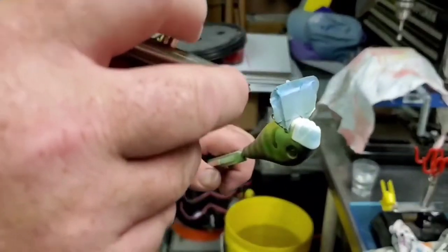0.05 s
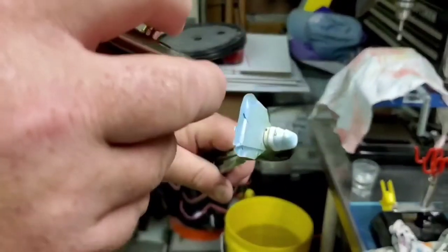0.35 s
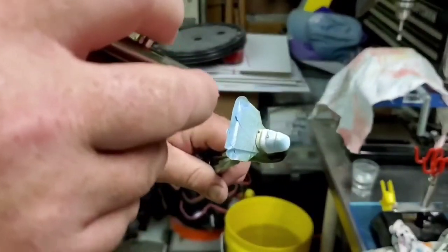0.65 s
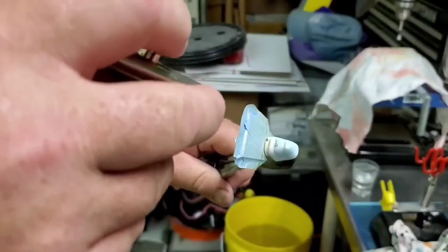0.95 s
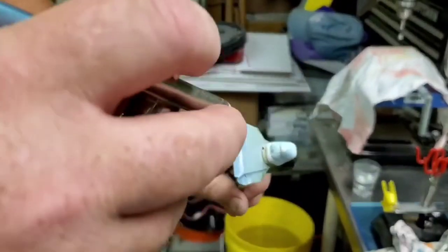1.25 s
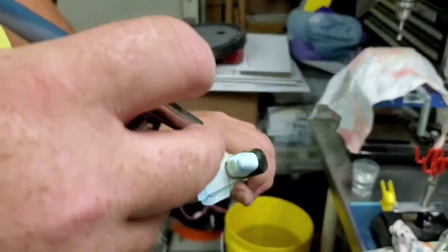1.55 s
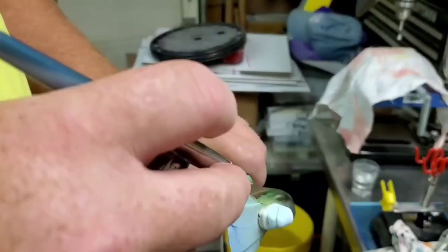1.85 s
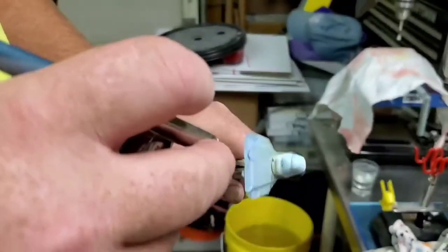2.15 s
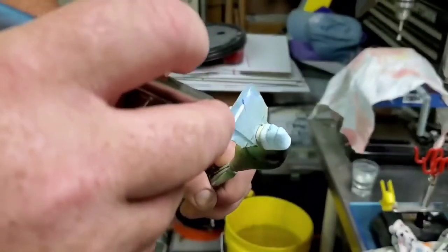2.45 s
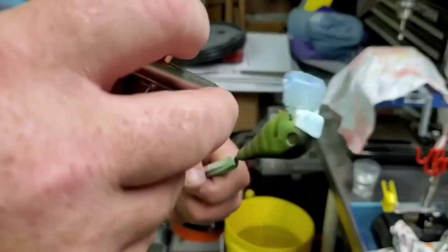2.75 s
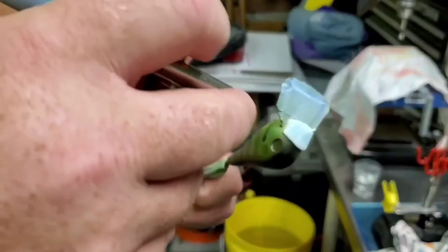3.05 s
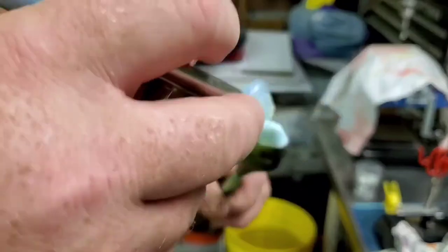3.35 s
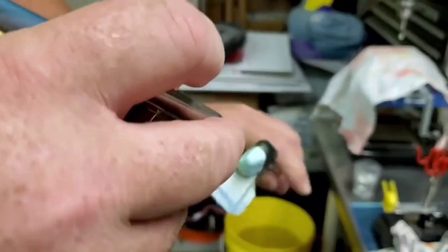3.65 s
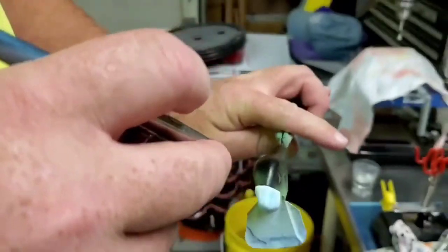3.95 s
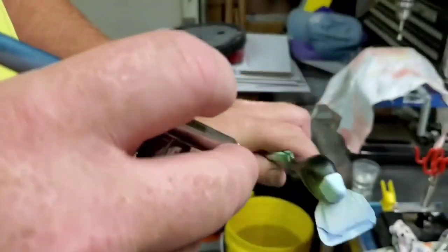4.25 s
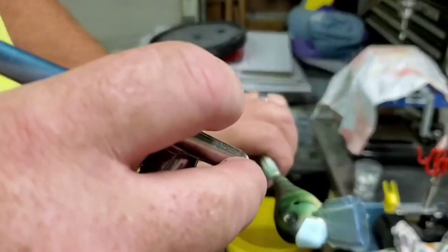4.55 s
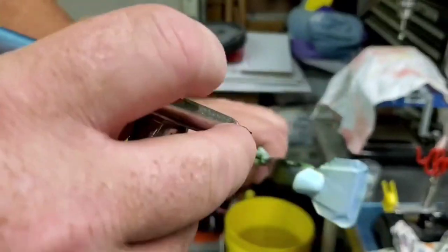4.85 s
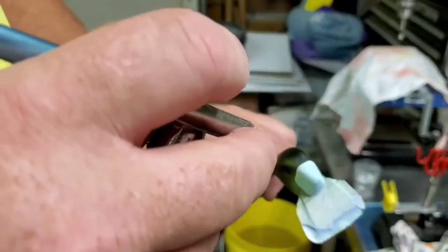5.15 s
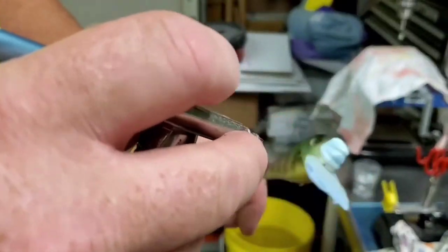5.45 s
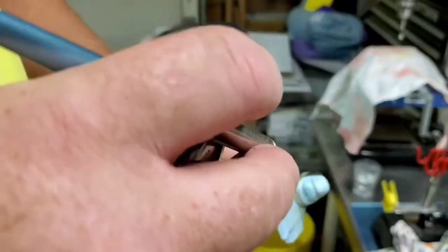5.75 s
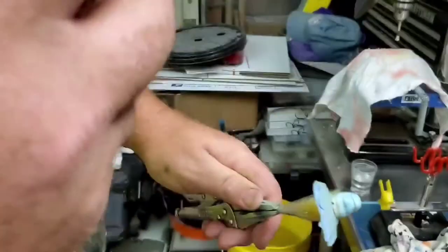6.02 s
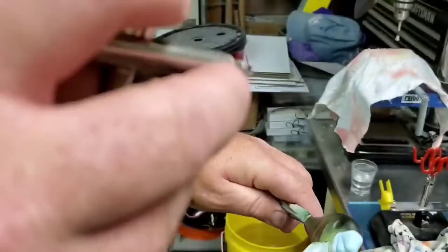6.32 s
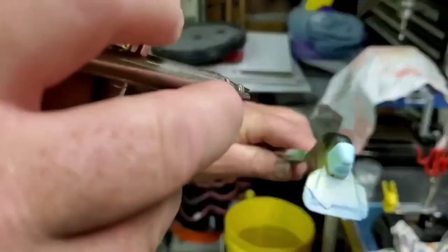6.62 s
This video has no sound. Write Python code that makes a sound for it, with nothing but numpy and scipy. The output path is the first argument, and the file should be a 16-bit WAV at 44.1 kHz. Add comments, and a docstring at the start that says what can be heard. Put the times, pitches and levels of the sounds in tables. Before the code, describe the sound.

Close bursts of airbrush hiss start and stop unevenly, ending in quick puffs, while a workshop fan hums faintly.

```python
"""An airbrush sprays a small hand-held lure in a workshop, over a fan's steady whine and rumble.
At each press of the trigger a valve opens and stored air spits out; the turbulent jet then fizzes,
hisses and roars against the lure, whistling where an edge crosses it. After most bursts the trigger
ticks as it springs back, and now and then there is a soft low bump. At 4.5 s the valve squeaks;
the longest stroke follows, then four quick puffs, and from about 6.5 s the fan is left alone."""
import sys
import numpy as np
from scipy import signal
from scipy.fft import rfft, irfft, next_fast_len
from scipy.io import wavfile
from scipy.ndimage import uniform_filter1d, map_coordinates

SR = 44100
rng = np.random.default_rng(int(sys.argv[2]) if len(sys.argv) > 2 else 0)


def put_to_file(sound):
    """Save the sound as 16-bit audio at rate SR, in the file named by the first command-line argument."""
    columns = np.atleast_2d(sound).T  # one column per channel
    safe = np.clip(columns, -1, 1)
    whole_steps = np.round(safe * 32767)
    wavfile.write(sys.argv[1], SR, whole_steps.astype(np.int16))


N = 303408
TIME = np.arange(N) / SR

# Noise spectra of the jet's three parts: frequency_hz, relative_density_db
FIZZ_SPECTRUM = [(6500, -34), (8000, -2.5), (9500, -2), (11500, 0), (13500, 2), (14500, 0), (16000, -5.5)]
HISS_SPECTRUM = [(1300, -13.5), (2200, -4), (2900, 0), (3500, -0.5), (4500, -1.5), (5500, -2), (6200, -4.5),
                 (7400, -3), (8300, -13), (10000, -42)]
ROAR_SPECTRUM = [(82, -39.5), (140, -12.5), (183, -17), (267, -5), (325, -9.5), (446, -1), (598, -4),
                 (657, -0.5), (713, -4), (783, -0.5), (978, -4), (1330, -2), (1860, -4.5), (2300, -12),
                 (2990, -31.5), (5060, -120)]


def jet(spurt_s=6.226, spurt_db=9.5, roar_db_per_impact_db=1.36, crossover_hz=600):
    """Turbulence radiates broadband noise: fizz at the nozzle, hiss in the spray, a roar on the lure."""
    fizz_gain, hiss_gain, roar_gain, low_gain = strokes()
    impact_db = incidence() + .5 * wobble(16)  # the hand is never quite still
    fizz_db = spurt_db * swell(spurt_s, 0.0097) + 0.51 * wobble(20)  # the nozzle clears in one spurt
    fizz = fizz_gain * amp(fizz_db) * swirled(noise(FIZZ_SPECTRUM), depth_db=2.5)
    hiss = hiss_gain * amp(impact_db) * swirled(noise(HISS_SPECTRUM), depth_db=0.98)
    roar_db = roar_db_per_impact_db * impact_db + 0.81 * wobble(60)
    roar = amp(roar_db) * swirled(noise(ROAR_SPECTRUM), depth_db=1.0)
    low = filtered(roar, lambda hz: 1 / (1 + (hz / crossover_hz) ** 4))
    flutter = amp(0.65 * wobble(170))  # the paint breaks up unevenly
    return flutter * (fizz + hiss + edge_tone(hiss_gain) + roar_gain * (roar - low) + low_gain * low)


# Trigger presses; the lure faces the jet at facing_fraction of the stroke:
# open_s, shut_s, spit_db, spit_t60_s, fizz_db, hiss_db, roar_db, low_roar_boost_db, facing_fraction
PRESSES = [(0.078, 0.365, -39.5, 0.05, -40, -39.3, -39.5, 2.5, 0.43),
           (0.516, 1.21, -36.5, 0.079, -39.5, -39.5, -40.5, -2.5, 0.5),
           (1.692, 1.893, -58, .04, -38.5, -39, -39.5, 0, 0.61),
           (2.103, 2.418, -32.5, 0.086, -39, -38, -39.5, -1.5, 0.59),
           (2.536, 2.923, -31, 0.039, -38.5, -37.5, -37.5, -4.5, 0.49),
           (3.094, 3.531, -38.5, 0.045, -40, -40.5, -39, 1.5, 0.24),
           (3.73, 3.837, -37.5, 0.13, -38.5, -41.5, -44.5, 0, 0.46),
           (4.1, 4.462, -29, 0.4, -40.5, -40.5, -39.5, 3, .45),
           (4.747, 5.698, -24.5, 0.065, -38.5, -38.5, -38, 0, 0.48),
           (5.934, 6.071, -52, 0.065, -41.5, -40.7, -43, 3, 0.63),
           (6.195, 6.235, -54, .06, -40.5, -36.5, -49, -5, 0.66),
           (6.315, 6.329, -62, .06, -42, -43.5, -61, -1, .5),
           (6.363, 6.382, -73, .06, -42.5, -43.5, -57, 2, 0.4)]


def strokes(draw_s=0.54, draw_db_per_s=6.5, ease_db_per_s=4, paint_lag_s=.004):
    """Jet noise grows with flow: gains of fizz, hiss, roar and low roar as the trigger is worked."""
    gains = np.zeros((4, N))
    for start, end, _, _, fizz_db, hiss_db, roar_db, low_boost_db, facing in PRESSES:
        age = np.clip(TIME - start, 0, end - start)
        draw = amp(draw_db_per_s * np.minimum(age, draw_s) - ease_db_per_s * np.maximum(age - draw_s, 0))
        off_face = (2 * (age / (end - start) - facing)) ** 2  # 1 at half a stroke from the lure's face
        air = draw * valve(start, end)
        fizz = draw * valve(start + paint_lag_s, end + paint_lag_s) * amp(fizz_db)
        hiss = air * amp(hiss_db - 1.07 * off_face)
        roar = air * amp(roar_db - 2.5 * off_face)
        gains += [fizz, hiss, roar, roar * amp(low_boost_db)]
    return gains


def valve(start, end, open_db_per_s=1250, shut_db_per_s=861):
    """Throttling: the flow (0-1) builds exponentially and bleeds away a little more slowly."""
    closed_db = np.maximum((start - TIME) * open_db_per_s, (TIME - end) * shut_db_per_s)
    return amp(-np.clip(closed_db, 0, 120))


# The lure turning under the jet, one list for each of two strokes: time_s, impact_db
LURE_TURNS = [
    [(2.12, -39), (2.154, -40), (2.204, -38), (2.292, -43), (2.318, -40), (2.358, -42.5), (2.406, -40),
     (2.42, -41)],
    [(4.78, -33.5), (4.946, -36), (4.964, -40.5), (5.118, -40), (5.146, -38), (5.35, -41), (5.498, -37),
     (5.552, -40), (5.69, -37)],
]


def incidence():
    """A jet is louder the more squarely it strikes: the swing in dB about each turn's mean."""
    swing_db = np.zeros(N)
    for turn in LURE_TURNS:
        time_s, impact_db = np.transpose(turn)
        during = (TIME > time_s[0] - .05) & (TIME < time_s[-1] + .05)
        swing_db += during * np.interp(TIME, time_s, impact_db - impact_db.mean())
    return swing_db


def swirled(x, depth_db):
    """Spectral modulation: patches of gain shift as the jet meets changing faces of the lure."""
    spectra = signal.stft(x, nperseg=512)[2]
    patches = uniform_filter1d(rng.standard_normal(spectra.shape), size=5, axis=1)  # across frequency
    patches = uniform_filter1d(patches, size=22, axis=2)  # across time
    return unit(signal.istft(spectra * amp(depth_db * unit(patches)), nperseg=512)[1][:, :N])


# Edges of the lure crossing the jet: time_s, level_db
CROSSINGS = [(0.202, -41), (2.213, -38), (3.181, -38.5), (3.28, -40.5), (3.365, -38), (3.437, -35.5),
             (3.511, -42), (5.628, -35.5)]
# Their band of noise: frequency_hz, relative_density_db
EDGE_SPECTRUM = [(5000, -20.5), (6200, -9.5), (6900, -3.5), (7600, -2), (8100, -13.5), (9000, -23)]


def edge_tone(hiss_gain):
    """A jet split by an edge whistles breathily; faint stray whistles come and go with the spray."""
    crossings = sum(amp(level_db) * swell(time_s, 0.014) for time_s, level_db in CROSSINGS)
    stray = hiss_gain * amp(-17 + 4 * wobble(14))
    return (crossings + stray) * swirled(noise(EDGE_SPECTRUM), depth_db=-1.0)


def spits(rise_s=0.0046):
    """Pressure release: air stored in the hose leaves as a dull, decaying puff at each press."""
    envelope = np.zeros(N)
    for start, _, level_db, t60_s, *_ in PRESSES:
        age = TIME - start
        attack = np.clip(1 + age / rise_s, 0, 1)
        envelope += attack * amp(level_db - 60 * np.maximum(age - rise_s, 0) / t60_s)
    return envelope * noise([(30, -30), (120, 1.5), (400, 11.5), (1400, 13.5), (3500, 6), (5500, 0),
                             (7000, -30), (12000, -35)])


# The trigger springing back: time_s, relative_level_db, brightness_hz
TRIGGER_RETURNS = [(0.4496, -54, 2770), (1.312, -48.5, 2900), (1.9734, -53, 3210), (2.9867, -39, 2600),
                   (3.8545, -34.5, 3450), (4.5424, -56, 2710), (4.597, -57, 2190), (5.763, -47.5, 5780),
                   (5.79, -32.5, 4960), (6.434, -54.5, 3350)]
# Resonances of the metal body: centre_hz, bandwidth_hz, relative_level_db
BODY_MODES = [(1180, 620, -10), (2030, 320, -8), (2740, 230, -13), (3410, 580, 0.5), (4800, 490, -3.5),
              (5620, 990, -2.5), (7200, 800, -14), (11100, 2700, -6)]


def ticks(rise_s=0.0059, t60_s=0.069):
    """Modal resonance: the trigger scrapes to its stop and rings the body; soft contact is duller."""
    out = np.zeros((2, N))
    t = np.arange(SR // 4) / SR
    hz = np.fft.rfftfreq(len(t), 1 / SR)
    envelope = np.minimum(t / rise_s, 1) ** 2 * amp(-60 * np.maximum(t - rise_s, 0) / t60_s)
    for time_s, level_db, brightness_hz in TRIGGER_RETURNS:
        grip = np.exp(rng.normal(0, 0.013))  # the fingers shift the resonances
        body = sum(amp(mode_db + rng.normal(0, 4.5)) / (1 + ((hz - grip * centre) / (width / 2)) ** 2)
                   for centre, width, mode_db in BODY_MODES)
        contact_lowpass = 1 / (1 + (hz / (1.7 * brightness_hz)) ** 6)
        friction = rfft(rng.standard_normal((2, len(t))))
        scrape = unit(irfft(friction * body * contact_lowpass, len(t)))
        onset = round((time_s - rise_s / 2) * SR)
        out[:, onset:onset + len(t)] += amp(level_db - 8) * envelope * scrape
    return out


def reflections(x, echo_db, max_delay_s=.009, count=7):
    """Comb filtering: the bench and moving hands return weak early copies, different at each ear."""
    echoes = np.zeros((2, N))
    for ear in range(2):
        for delay_s in max_delay_s * rng.uniform(0.1197, 1, count):
            delayed = np.pad(x[ear], (round(delay_s * SR), 0))[:N]
            echoes[ear] += np.tanh(wobble(1.503)) * delayed
    return (x + amp(echo_db) * echoes / np.sqrt(count / 3)) / np.sqrt(1 + amp(echo_db) ** 2)


# The valve seating: time_s, pitch_hz, level_db
VALVE_SQUEAK = (4.53, 4630, -69)


def squeak():
    """Flow-induced tone: air whistles thinly past the valve seat, once."""
    time_s, pitch_hz, level_db = VALVE_SQUEAK
    return amp(level_db) * swell(time_s, 0.022) * np.sin(2 * np.pi * pitch_hz * TIME + .5 * wobble(120))


# Soft bumps close by: time_s, level_db
BUMPS = [(0.078, -44), (2.535, -46), (3.095, -48), (3.862, -42), (4.722, -38), (6.487, -39)]


def bumps():
    """A short pulse of low-frequency noise is heard as a dull thud with no ring."""
    envelope = sum(amp(level_db) * swell(time_s, 0.015) for time_s, level_db in BUMPS)
    return envelope * noise([(20, -30), (60, 14), (110, -7), (200, -50), (600, -60)])


# Partials of the fan's whine: pitch_hz, level_db
FAN_PARTIALS = [(323.0, -67.5), (602.9, -78.5), (721.4, -58), (839.8, -82), (2815, -102), (2993, -83),
                (3408, -87), (3881, -86.5)]
# The whine's phase between the ears: time_s, apart_rad
INTERAURAL_PHASE = [(0.1, 3.6), (0.45, 1.7), (2.0, 1.4), (4.6, 1.73), (5.8, 0.45), (6.13, 4.1),
                    (6.26, 0.31), (6.7, 0.52), (6.76, 2.1)]
# Spectra of the rumble and the moving air: frequency_hz, relative_density_db
RUMBLE_SPECTRUM = [(15, -22), (30, -18), (45, -15), (54, -3), (62, -6), (72, -12), (100, -14), (130, -25.5),
                   (200, -27.5), (240, -43), (400, -71)]
DRAUGHT_SPECTRUM = [(200, -28), (270, -9.5), (345, 2), (400, -11), (600, -11), (680, -9.5), (850, -14.5),
                    (1000, -23.5), (1250, -24), (1700, -31), (2600, -32), (3000, -26), (3600, -36.5),
                    (8000, -43)]
# A dip near 9 kHz in the recorder's faint background hiss: frequency_hz, gain_db
FLOOR_HISS_DIP = [(7800, 0), (8800, -22), (10200, -13), (11500, 3)]


def fan(rumble_db=-52.06, draught_db=-59.5):
    """Tonal plus broadband noise: a whine drifts in phase between the ears over rumble and moving air."""
    whine = np.zeros((2, N))
    for pitch_hz, level_db in FAN_PARTIALS:
        apart_rad = np.interp(TIME, *np.transpose(INTERAURAL_PHASE)) + 0.27 * wobble(2.4)
        phase = 2 * np.pi * (pitch_hz * TIME + rng.random()) + .2 * wobble(4.3)
        gain = amp(level_db + 0.5 + 0.68 * wobble(5))
        whine += gain * np.sin(phase + np.outer([.5, -.5], apart_rad))
    rumble = amp(rumble_db + 1.8 * wobble(9)) * noise(RUMBLE_SPECTRUM)
    draught_and_floor = amp(draught_db) * noise(DRAUGHT_SPECTRUM)
    return whine + rumble + filtered(draught_and_floor, lambda hz: amp(along(FLOOR_HISS_DIP, hz)))


def amp(db):
    """Decibels to amplitude ratio."""
    return 10 ** (np.asarray(db) / 20)


def unit(x):
    """Normalisation to rms 1."""
    return x / np.sqrt(np.mean(x ** 2) + 1e-20)


def along(points, hz):
    """Interpolation of (frequency_hz, value) points on a log-frequency axis."""
    frequencies, values = np.transpose(points)
    return np.interp(np.log(hz + 1), np.log(frequencies + 1), values)


def swell(centre_s, width_s):
    """A Gaussian rise and fall."""
    return np.exp(-.5 * ((TIME - centre_s) / width_s) ** 2)


def wobble(knots_per_s):
    """Smooth random modulation: a spline through Gaussian knots."""
    return map_coordinates(rng.standard_normal(int(N * knots_per_s / SR) + 4), [TIME * knots_per_s])


def filtered(x, response):
    """Linear filtering: the spectrum of x times a frequency response."""
    size = next_fast_len(N + 8192)
    return irfft(rfft(x, size) * response(np.fft.rfftfreq(size, 1 / SR)), size)[..., :N]


def noise(spectrum):
    """Coloured noise of rms 1, uncorrelated between the ears."""
    return unit(filtered(rng.standard_normal((2, N)), lambda hz: amp(along(spectrum, hz))))


def scene():
    """Superposition: the airbrush and its reflections close by, the fan behind."""
    return reflections(jet() + spits() + ticks(), echo_db=-6.5) + squeak() + bumps() + fan()


# Treble balance of the two microphone ports: frequency_hz, left_minus_right_db
PORT_BALANCE = [(5500, 0), (7300, 2.5), (8200, -1.5), (9200, -5), (10200, -6), (12000, -2.5), (14500, -4)]


def record(dry, band_limit_hz=14600):
    """Frequency response: the left port hears less top treble, and both cut off at the band limit."""
    def response(hz):
        balance = amp(np.outer([.5, -.5], along(PORT_BALANCE, hz)))
        lowpass = amp(-np.clip((hz - band_limit_hz) / 10, 0, 120))
        return balance * lowpass
    return filtered(dry, response)


dry = scene()
out = record(dry)
put_to_file(out)
```